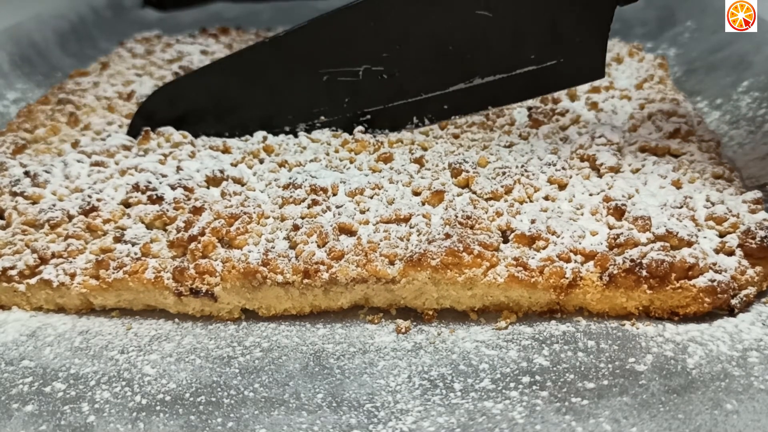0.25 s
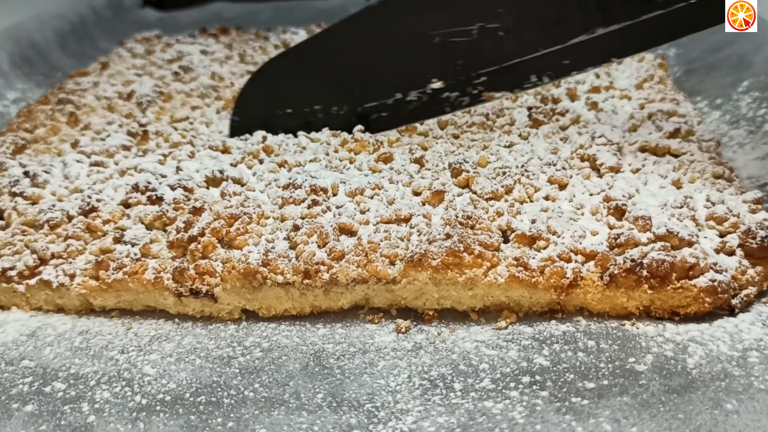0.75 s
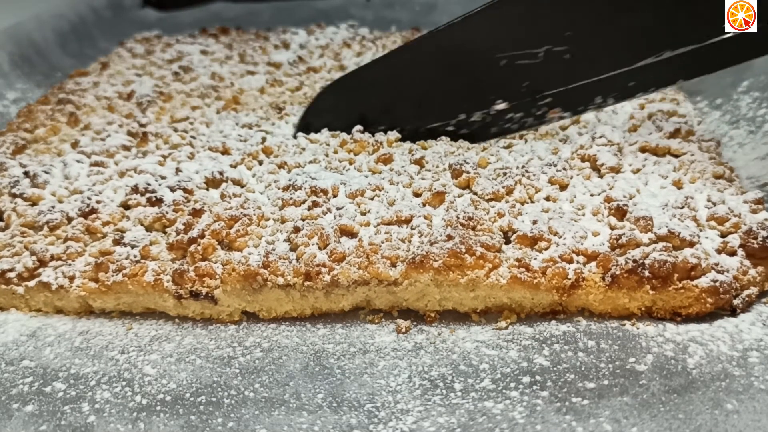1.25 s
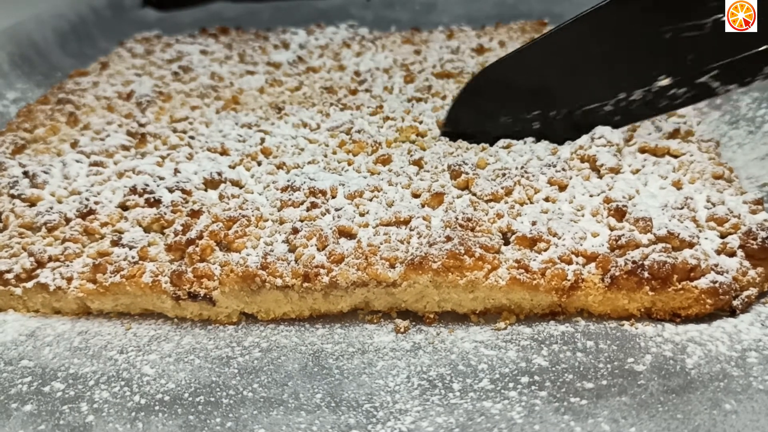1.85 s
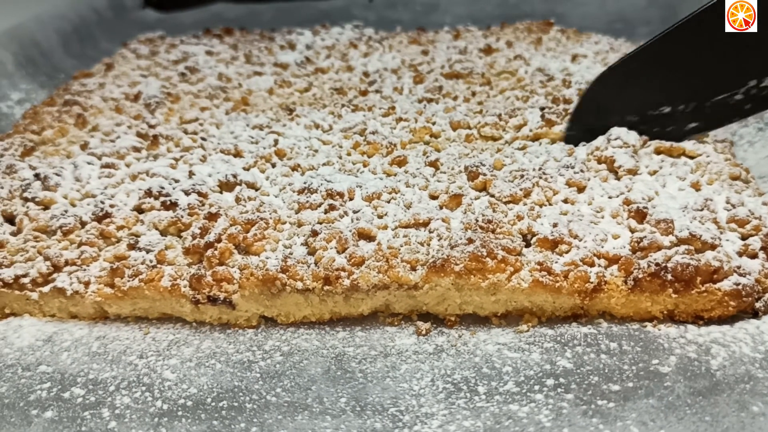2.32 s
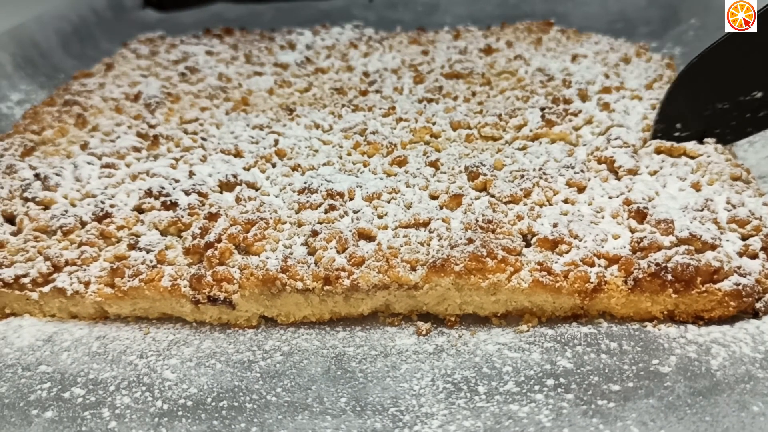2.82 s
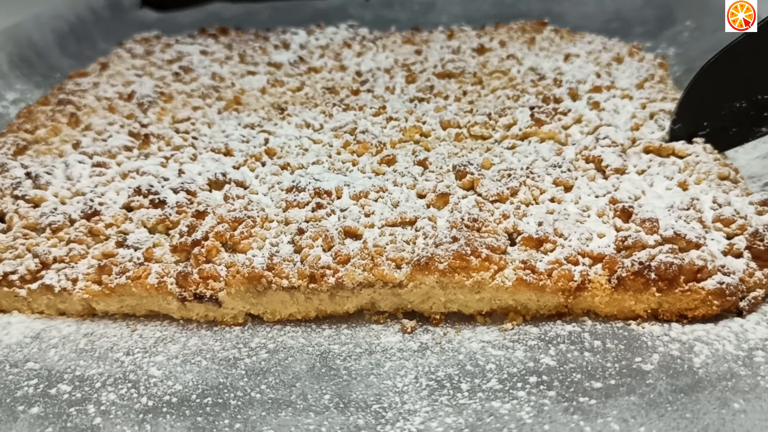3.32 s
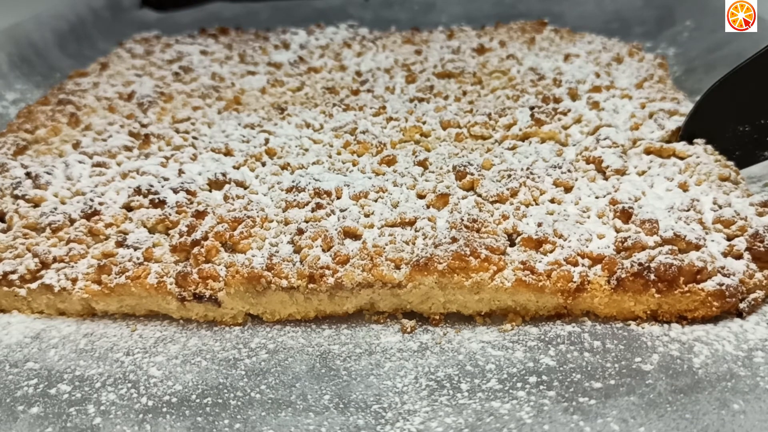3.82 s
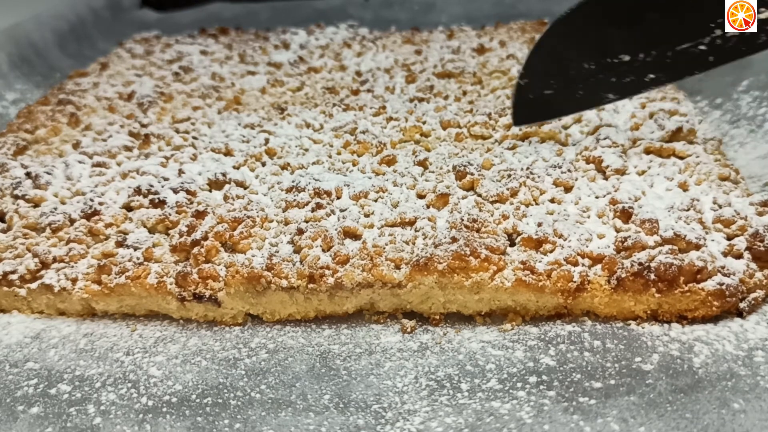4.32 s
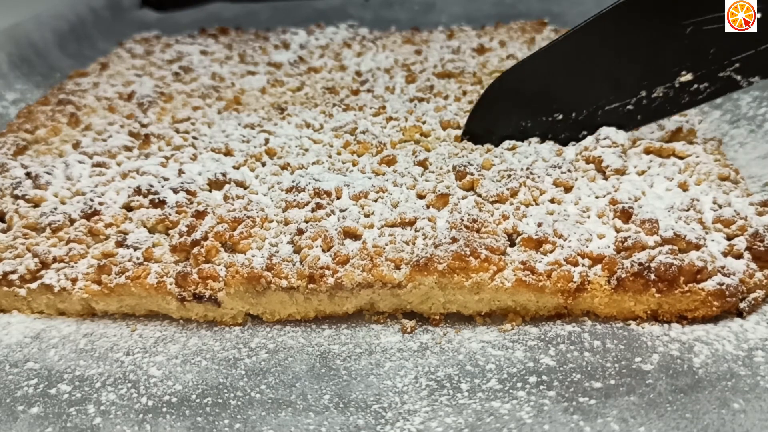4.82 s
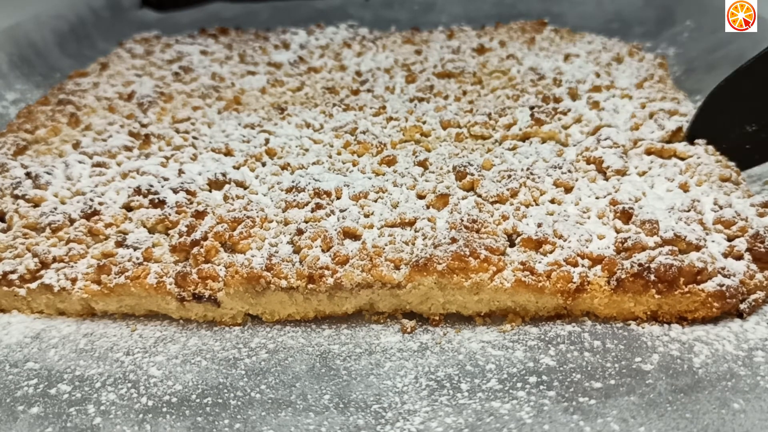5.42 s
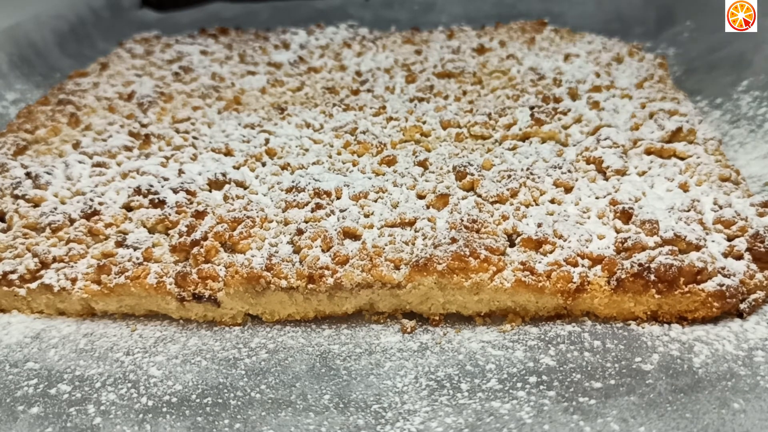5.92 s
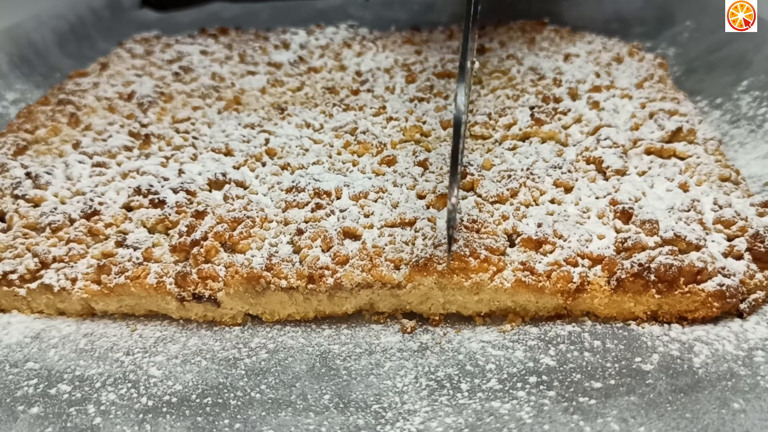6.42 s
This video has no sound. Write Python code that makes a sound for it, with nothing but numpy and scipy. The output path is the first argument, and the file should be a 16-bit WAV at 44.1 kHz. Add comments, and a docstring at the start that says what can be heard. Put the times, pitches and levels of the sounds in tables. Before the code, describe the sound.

A knife saws through the sugared crumb crust of a tart on a tray, close by in a small kitchen. From the start, short strokes hiss and grind softly, with little ticks and snaps of breaking crumbs. Lumps catch the blade and make the tray thud, lightly around 1 and 1.6 seconds, then harder at 2.1 and 3.1 seconds. The loudest crack and knock comes at 3.5 seconds, followed by another at 3.8 and a sharp click near 4.1. The steel rings faintly with the shocks. After a brief lull, cutting resumes at 4.8 seconds with a cluster of thuds and crunches, strongest at 4.9 and 5.2, and a crisp click at 5.6. Soft scraping continues until about 6.4 seconds. A low appliance hum and quiet room noise run throughout, and a very faint, distant tone sounds at 5.8 and 6.5 seconds.

```python
"""A small kitchen: a knife saws in short strokes over the sugared crumb crust of a tart on a tray.
The edge hisses on sugar, crumbs grind and snap, and lumps jolt the blade so that tart and tray thud.
The steel rings faintly with the shocks and sings for a moment here and there as it drags.
Underneath lie a low appliance hum and room noise; near the end a faint, far tone sounds twice."""
import sys
import numpy as np
from scipy import signal
from scipy.io import wavfile

SR = 44100
rng = np.random.default_rng(int(sys.argv[2]) if len(sys.argv) > 2 else 0)


def bounce(signal):
    """Save signal as a 16-bit WAV file at the path given by the first command-line argument."""
    frames = np.transpose(np.atleast_2d(signal))
    limited = np.clip(frames, -1, 1)
    pcm = np.round(limited * 32767).astype(np.int16)
    wavfile.write(sys.argv[1], SR, pcm)


N = 293706

# The blade saws to and fro. Each row: start in seconds, length in seconds, opening hiss in dB,
# closing hiss in dB, grinding in dB.
STROKES = [(-0.03, 0.21, -42, -45, -55.5), (0.214, 0.31, -59, -51.5, -60),
           (0.568, 0.34, -44.5, -53.5, -57.5), (0.856, 0.19, -57, -47.5, -53),
           (1.03, 0.12, -37, -50, -50.5), (1.187, .26, -39.5, -49.5, -53.5),
           (1.456, 0.22, -54.5, -42.5, -50), (1.724, 0.3, -44.5, -39, -55.5), (2.023, 0.13, -53, -39, -51),
           (2.152, 0.089, -51, -56, -64), (2.252, 0.25, -38, -51, -54), (2.516, 0.19, -51.5, -55, -60.5),
           (2.733, 0.22, -45, -51.5, -61.5), (2.951, 0.21, -50, -37.5, -48), (3.171, 0.2, -50, -44.5, -63),
           (3.457, 0.2, -49, -51, -47), (3.633, 0.19, -44.5, -44.5, -53), (3.808, 0.19, -26, -70, -51),
           (4.015, 0.15, -49, -51.5, -57), (4.812, 0.12, -70, -42, -57.5), (5.005, 0.2, -51.5, -52, -59.5),
           (5.305, 0.19, -45, -35, -50.5), (5.491, 0.21, -36.5, -63, -61), (5.64, 0.17, -74, -75, -61.5),
           (5.856, 0.3, -49.5, -67.5, -65), (6.11, 0.1, -52, -62, -69), (6.196, 0.18, -59, -52, -64)]
# The blade ploughs through a heap of crumbs. Each row: peak time in seconds, length in seconds,
# then hiss, crushing and rumble in dB.
CRUNCHES = [(0.349, 0.038, -47, -52, -47), (0.625, 0.023, -44, -46, -49), (1.08, 0.073, -50, -62, -47.5),
            (1.257, 0.026, -59, -42.5, -70), (1.587, 0.028, -34, -45, -32.5), (1.791, 0.051, -66, -44, -63),
            (2.126, 0.042, -44, -46, -42.5), (2.336, 0.048, -36, -55, -59),
            (2.588, 0.06, -45.5, -54.5, -48.5), (2.691, 0.016, -37, -48, -46.5),
            (3.032, 0.022, -29.5, -38.5, -41.5), (3.061, 0.046, -32.5, -39, -38),
            (3.518, 0.025, -36, -41, -45), (3.543, 0.01, -19.5, -20.5, -24), (3.695, 0.054, -53, -56, -52),
            (3.817, 0.023, -35, -35.5, -42), (4.952, 0.033, -54, -57, -38), (5.051, 0.043, -58, -47, -30),
            (5.109, 0.037, -48, -47.5, -37), (5.204, 0.038, -45, -45, -45.5), (5.323, 0.045, -56, -49, -38),
            (5.452, 0.073, -39.5, -39, -33.5), (5.57, 0.045, -30.5, -46, -72)]
# The blade catches a lump. Each row: time in seconds, thud drive in dB, rebound in dB against the thud,
# then crack, snap and tick in dB.
CATCHES = [(.159, -50, -12, -51, -57, -40), (0.249, -57, -14, -60, -64, -46),
           (0.274, -43, -12, -55, -66, -36), (0.478, -35, -12, -47.5, -63, -34),
           (0.6649, -45, -10, -61, -65, -43), (0.709, -48, -10, -66, -56, -32),
           (0.936, -33.5, -6, -39.5, -60, -32), (1.0447, -27.5, -12, -30.5, -35, -26),
           (1.0733, -26.5, -9.5, -35.5, -37, -32), (1.5727, -23, -26, -33.5, -52, -29),
           (1.585, -15, -16, -29.5, -46, -40), (1.606, -32, -14, -53, -46, -45),
           (1.684, -56, -10, -62, -61, -39), (1.721, -45, -14, -57, -48, -46),
           (1.725, -60, -12, -64, -60, -32), (2.046, -43, -12, -55, -48, -46),
           (2.1344, -7.5, -18.5, -32.5, -37, -49), (2.203, -42, -12, -60, -49, -48),
           (2.6836, -38, -6, -38, -36, -25), (2.7683, -53, -12, -45.5, -57, -21),
           (3.007, -31.5, -10, -39, -39, -27), (3.0709, -7.5, -16, -23.5, -27, -28),
           (3.0967, -21.5, -10, -55, -36, -23.5), (3.4457, -44, -16, -46, -41, -34.5),
           (3.502, -29, -15, -38, -38, -40), (3.5202, -22.5, -5, -25, -23, -26),
           (3.5416, 2, -13.5, -18, -8, -16), (3.578, -22.5, -9, -38, -50, -50),
           (3.619, -21, -9.5, -59, -55, -55), (3.821, -4.5, -12.5, -21.5, -26, -27),
           (3.867, -31, -16, -50, -50, -50), (3.879, -50, -12, -55, -42, -42),
           (3.905, -36, -12, -34.5, -28.5, -30), (3.9993, -36, -12, -42, -32, -27.5),
           (4.053, -45, -12, -55, -55, -46), (4.076, -37, -9, -37, -17, -10),
           (4.13, -32, -14, -45, -41, -27), (4.685, -58, -12, -68, -63, -37),
           (4.8564, -59, -12, -47, -51, -57), (4.8974, -0.5, -20, -22, -62, -32),
           (4.923, -20, -13, -53, -60, -62), (4.952, -45, -12, -37.5, -34.5, -42),
           (5.0409, -14.5, -17, -40, -63, -54), (5.053, -18.5, -12, -36, -47, -55),
           (5.069, -30, -20, -47, -55, -55), (5.1086, -36, -12, -34, -55, -45),
           (5.208, -3, -16, -18.5, -55, -53), (5.235, -19, -9, -42, -60, -60),
           (5.326, -18, -21, -37.5, -55, -53.5), (5.41, -14, -19, -25.5, -28, -30),
           (5.431, -23.5, -7, -24, -36, -35), (5.436, -28, -10, -26, -22.5, -44),
           (5.46, -19, -10, -29, -31, -45), (5.516, -38, -10, -57, -45, -40),
           (5.5295, -28, -19, -35, -28.5, -22), (5.565, -54, -12, -64, -35, -30),
           (5.604, -57, 0, -35, -20.5, -10), (5.746, -48, -23, -53, -43.5, -57),
           (5.892, -87, -12, -62, -47, -43)]
# Crack, snap and tick of a crumb. Each row: low and high edge in Hz, delay and t60 in seconds.
BREAK_BANDS = [(1050, 3600, .0005, .022), (5000, 7000, .002, .012), (7600, 13500, .002, .009)]
# The colour of the edge on sugar. Each row: frequency in Hz, relative spectral level in dB.
HISS_COLOUR = [(3530, -5.5), (5900, 3), (6400, 3), (7200, 4), (7900, 3.5), (8600, 9), (9800, 7),
               (10300, 10.5), (10800, 9), (11300, 2), (14700, -35), (22000, -120)]
# The colour of grinding crumbs. Each row: frequency in Hz, relative spectral level in dB.
GRIND_COLOUR = [(530, -28), (900, 4), (1630, 0.5), (1740, 6.5), (2290, 2.5), (2990, 1), (5550, 8),
                (7000, -83), (9100, -59), (15400, -120)]
# The resonances of tart and tray. Each row: pitch in Hz, relative level in dB, t60 in seconds.
TRAY_MODES = [(130.4, -6, 0.35), (345, -14, 0.22), (362, -16, 0.2), (422, -14, 0.25), (448.5, -19, 0.2),
              (500.5, -18.5, 0.23), (553, -33, 0.15), (600, -12, 0.2), (712, -19, 0.15), (872, -14, 0.11),
              (1005, -13, 0.09), (1200, -18, .08), (1390, -15.5, 0.054)]
# The resonances of the steel. Each row: pitch in Hz, relative level in dB, t60 in seconds.
BLADE_MODES = [(1000, -8, 0.02), (1400, -10, 0.015), (1680, -7, 0.018), (2224, -4, .022), (2455, -2, 0.017),
               (2790, -3, 0.022), (3222, -5, 0.016), (3810, -5, 0.013), (4285, -7, 0.015),
               (5280, -12, 0.012)]
# The dragged blade sings. Each row: peak time in seconds, length in seconds, pitch in Hz, level in dB.
BLADE_NOTES = [(.75, .2, 10800, -55), (1.33, .2, 10600, -52), (1.26, .035, 1000, -46),
               (1.26, .035, 1680, -45), (1.26, .05, 2450, -43), (1.254, .025, 4100, -46),
               (1.59, .027, 1300, -41), (1.798, .04, 2200, -44), (1.79, .03, 2650, -47),
               (5.055, .04, 1050, -42), (5.055, .036, 2760, -46), (5.055, .04, 3870, -47),
               (5.33, .03, 1000, -44), (5.45, .05, 1840, -41), (5.585, .022, 8300, -39)]
# The appliance's wavering hum. Each row: pitch in Hz, bandwidth in Hz, level in dB.
HUM_BANDS = [(130.4, 2, -61), (208.3, 15, -59), (263.5, 4.2, -57.5), (420.8, 15, -62)]
# A distant tone. Each row: start in seconds, length in seconds, pitch in Hz, level in dB.
FAR_TONES = [(5.81, 0.18, 868, -58), (6.51, 0.12, 832, -52.5)]
# The colour of the room noise. Each row: frequency in Hz, relative spectral level in dB.
ROOM_COLOUR = [(15, -74), (25, -86), (81, -9.5), (136, 7), (180, -1.5), (215, 12.5), (232, -23),
               (264, -1.5), (452, -4), (836, -8), (1510, -14.5), (7380, -26), (9780, -22.5), (11400, -30.5),
               (14800, -78), (22000, -120)]
# Stereo width of the noise beds. Each row: frequency in Hz, left-right likeness (1 is mono).
STEREO_LIKENESS = [(60, 0.26), (180, 0.53), (550, 0.077), (1650, -0.0), (4970, 0), (15000, 0)]
# Stereo balance of the noise beds. Each row: frequency in Hz, left over right in dB.
STEREO_LEAN = [(60, 8.5), (240, 4.5), (950, 3.5), (3770, 1), (15000, 2.5)]

THUD_HZ, THUD_T60_S = 533, 0.0083
REBOUND_HZ, REBOUND_T60_S = 378, 0.053   # the whole tray bounces, deeper than the first thud
TRAY_CUT_HZ = 310   # too small a body to send out deep bass
RIGHT_LAG = 11   # samples: the knife is nearer the left
SIDE = np.array([[1], [-1]])   # adds on the left, subtracts on the right


def knife_strokes():
    """Sugar hisses and crumbs grind straight into the air; the dragging force shakes the tray."""
    hiss_level, grind_level, rumble_level, crush_level = stroke_envelopes()
    sugar = coloured(grains(5000, spread_db=2, clump_db=1.5), HISS_COLOUR, flicker_db=1.8, per_octave=8)
    crumbs = coloured(grains(4000, spread_db=1.6, clump_db=1.5), GRIND_COLOUR, flicker_db=1.5)
    mid, side = grains(2000, spread_db=2, clump_db=2)[0]
    drag = band(mid + 0.43 * side * SIDE, TRAY_CUT_HZ, 2000)
    force = rumble_level * drag
    rumble = ring(force, THUD_HZ, THUD_T60_S) + 0.25 * tray_ring(force)
    rumble /= np.std(ring(drag, THUD_HZ, THUD_T60_S))
    heap = rms_one(band(crumbs, 1210, 4300) + crumbs)   # a heap crushes duller than the crust grinds
    return hiss_level * sugar + grind_level * crumbs + crush_level * heap + rumble


def stroke_envelopes(attack_s=0.044, release_s=0.046, settle_s=0.1, rise_share=0.46):
    """Hiss, grind, rumble and crush levels: strokes swell, slide and let go; crunches ride on top."""
    hiss, grind, rumble, crush = range(4)
    t, power = np.arange(N) / SR, np.zeros((4, N))
    for start, length, first_db, last_db, grind_db in STROKES:
        span = slice(max(round(start * SR), 0), round((start + length) * SR))
        age = t[span] - start
        hiss_db = first_db + (last_db - first_db) * age / length
        crumb_db = grind_db + 0.8 * (hiss_db - (first_db + last_db) / 2)   # follows the hiss's slope
        ramp = np.clip(np.minimum(age / attack_s, (length - age) / release_s), 0, 1)
        contact = np.sin(np.pi / 2 * ramp) ** 2
        power[[hiss, grind, rumble], span] += (contact * from_db([hiss_db, crumb_db, crumb_db - 6])) ** 2
    power[hiss] *= from_db(-3 * drift(5.6)) ** 2   # uneven contact
    power[rumble] *= from_db(-3.5 * drift(6.4)) ** 2
    fade = np.exp(-1 / (settle_s * SR))
    trickle = signal.lfilter([1 - fade], [1, -fade], power[[hiss, grind]])   # loosened sugar runs on
    power[[hiss, grind]] += from_db(-13.5) ** 2 * trickle
    for peak, length, *levels_db in CRUNCHES:
        span = slice(round((peak - .12) * SR), round((peak + .18) * SR))
        slope_s = length * np.where(t[span] < peak, rise_share, 1 - rise_share)
        swell = np.exp(-((t[span] - peak) / slope_s) ** 2)
        power[[hiss, crush, rumble], span] += np.outer(from_db(levels_db), swell) ** 2
    return np.sqrt(power)


def grains(per_s, spread_db, clump_db):
    """Tiny fractures in random clumps, each a short noise burst; gives two mid-side pairs."""
    fractures = rng.random(N) < per_s / SR
    size_db = spread_db * np.minimum(rng.exponential(1, N), 4) + clump_db * drift(25)
    bursts = signal.lfilter([1], [1, -.93], fractures * from_db(size_db))
    return bursts * rng.standard_normal((2, 2, N))


def lump_thuds(lead_s=0.0006, rebound_s=0.0122):
    """Just before a lump breaks, tart and tray thud; they rebound once and the worktop jolts deeply."""
    times, thud_db, rebound_db = np.transpose(CATCHES)[:3]
    at = (times * SR).astype(int)
    force = from_db(thud_db) * pan(left_db=1.7)
    push, rebound = np.zeros((2, 2, N))
    push[:, at - round(lead_s * SR)] = -force
    rebound[:, at + round((rebound_s - lead_s) * SR)] = from_db(rebound_db) * force
    worktop = from_db(7.5) * band(push + 1e-18, 25, 87.5)
    cushion = 0.66 / 16 * rms_one(np.hanning(36))   # the crust gives for about a millisecond
    softened = signal.lfilter(cushion, [1], np.array([push, rebound]) + 1e-18)
    push, rebound = band(softened, TRAY_CUT_HZ, 4600)
    thuds = ring(push, THUD_HZ, THUD_T60_S) + ring(rebound, REBOUND_HZ, REBOUND_T60_S)
    tail = tray_ring(0.28 * push + 2 * rebound)   # the tray rings little until it rebounds
    return worktop + band(thuds, 214, 4000) + from_db(-10.5) * tail


def crumb_breaks():
    """Each lump breaks in three quick bursts of noise: a crack, a brighter snap and a tick on top."""
    times, _, _, *bursts_db = np.transpose(CATCHES)
    at, out = (times * SR).astype(int), 0
    for (low, high, delay, t60), level_db in zip(BREAK_BANDS, bursts_db):
        onsets = np.zeros((2, N))
        onsets[:, at + round(delay * SR)] = from_db(level_db) * pan(left_db=0.5)
        decay = signal.lfilter([1], [1, -from_db(-60 / (t60 * SR))], onsets + 1e-18)
        envelope = signal.lfilter([.1], [1, -.9], decay)   # rounds the attack, well under a millisecond
        shared, *each_side = rng.standard_normal((3, N))
        noise = from_left(shared, RIGHT_LAG) + 1.86 * np.array(each_side)
        out += envelope * rms_one(band(band(noise, low, high), low / 1.2, high * 1.05))
    return out


def tray_ring(force):
    """Every mode of tart and tray answers each push with a strength of its own."""
    return sum(from_db(db) * ring(force * from_db(1.8 * drift(20)), hz, t60)
               for hz, db, t60 in TRAY_MODES)


def blade_ring(knife):
    """Shocks set the steel ringing briefly; which modes speak changes with grip and angle."""
    shocks = band(knife[0], 1360, 9100)
    steel = sum(from_db(db) * ring(shocks * from_db(3.5 * drift(6)), hz, t60)
                for hz, db, t60 in BLADE_MODES)
    return from_db(-35) * from_left(steel, RIGHT_LAG)


def blade_song():
    """Friction noise through one narrow steel resonance per note, swelling and fading."""
    notes = np.zeros(N)
    for peak, length, hz, db in BLADE_NOTES:
        first, last = max(round((peak - length) * SR), 0), round((peak + length) * SR)
        friction = rng.standard_normal(SR)[:last - first]
        from_peak_s = np.arange(first, last) / SR - peak
        swell = np.exp(-(1.08 * from_peak_s / (length / 2)) ** 2)
        notes[first:last] += from_db(db) * swell * rms_one(ring(friction, hz, t60=.012))
    return from_left(notes, lag_samples=4)


def kitchen_echoes(sound, t60=0.13, wall_cut_hz=5400):
    """Dense, short echoes dulled by the walls; alike on both sides in the bass only."""
    t = np.arange(SR // 3) / SR
    mid, side = rng.standard_normal((2, len(t))) * from_db(-60 * t / t60) * (t > .003)
    echoes = mid + signal.lfilter(*signal.butter(1, 500, "high", fs=SR), side) * SIDE
    echoes = signal.lfilter(*signal.butter(1, wall_cut_hz, fs=SR), echoes)
    return signal.fftconvolve(sound, rms_one(echoes) / np.sqrt(len(t)), axes=1)[:, :N]


def appliance_hum():
    """An appliance drones to the left: narrow bands of noise that waver like unsteady tones."""
    out = 0
    for hz, width, db in HUM_BANDS:
        mid, side = ring(rng.standard_normal((2, N)), hz, t60=3.9 / width)
        out += from_db(db) * rms_one(mid + 0.58 * side * SIDE) * pan(left_db=4)
    return out


def far_tones():
    """A faint, pure tone swells and fades far off."""
    t, out = np.arange(N) / SR, 0
    for start, length, hz, db in FAR_TONES:
        swell = np.sin(np.pi * np.clip((t - start) / length, 0, 1)) ** .5
        out += from_db(db) * swell * np.sin(2 * np.pi * hz * t)
    return out


def room_noise():
    """A steady, dark bed of noise under everything."""
    return from_db(-48) * coloured(rng.standard_normal((2, 2, N)), ROOM_COLOUR, flicker_db=-0.08)


def coloured(pairs, colour, flicker_db, per_octave=3):
    """Two mid-side pairs shaped band by band in level, flicker, width and balance; rms 1."""
    low_hz, high_hz = max(colour[0][0], 25), min(colour[-1][0], 12500)
    edges = np.geomspace(low_hz, high_hz, 1 + round(per_octave * np.log2(high_hz / low_hz)))
    out = 0
    for k, (low, high) in enumerate(zip(edges, edges[1:])):
        mid, side = band(pairs[k % 2], low, high)
        hz = np.sqrt(low * high)
        alike = at_hz(STEREO_LIKENESS, hz)
        stereo = np.sqrt(1 + alike) * mid + np.sqrt(1 - alike) * side * SIDE
        gain = from_db(at_hz(colour, hz) + flicker_db * drift(7))
        out += gain * pan(at_hz(STEREO_LEAN, hz)) * stereo
    return rms_one(out)


def drift(rate_hz):
    """A slow random wander: noise twice through a one-pole low-pass; rms 1."""
    pole = np.exp(-80 * np.pi * rate_hz / SR)
    slow = signal.lfilter([1], [1, -2 * pole, pole * pole], rng.standard_normal(N // 40 + 2002))[2000:]
    return np.interp(np.arange(N) / 40, np.arange(len(slow)), rms_one(slow))


def ring(x, hz, t60):
    """One resonance: a unit click sets a sine of height 1 ringing down."""
    pole, angle = from_db(-60 / (t60 * SR)), 2 * np.pi * hz / SR
    return signal.lfilter([0, np.sin(angle)], [1, -2 * pole * np.cos(angle), pole * pole], x + 1e-18)


def band(x, low_hz, high_hz):
    return signal.sosfilt(signal.butter(2, [low_hz, high_hz], "band", fs=SR, output="sos"), x)


def from_left(x, lag_samples):
    return np.array([x, np.roll(x, lag_samples)])


def pan(left_db):
    return from_db(left_db / 2 * SIDE)


def at_hz(curve, hz):
    frequencies, values = np.transpose(curve)
    return np.interp(np.log(hz), np.log(frequencies), values)


def from_db(db):
    return 10 ** (np.asarray(db) / 20)


def rms_one(x):
    return x / np.sqrt(np.mean(x ** 2) + 1e-20)


def scene():
    """The knife up front, a touch of kitchen around it, the quiet background below."""
    knife = knife_strokes() + lump_thuds() + crumb_breaks()
    knife = knife + blade_ring(knife) + blade_song()
    return knife + from_db(-11.5) * kitchen_echoes(knife) + room_noise() + appliance_hum() + far_tones()


def record(dry, dip_hz=7170, dip_width_hz=2600, edge_hz=11305, whistle_hz=15570, cutoff_hz=16400):
    """The sound dips near 7 kHz and drops past a treble edge, save one narrow band and a faint hiss;
    peaks clip."""
    dipped = dry - 0.44 * band(dry, dip_hz - dip_width_hz / 2, dip_hz + dip_width_hz / 2)
    body = signal.sosfilt(signal.ellip(6, .5, 30, edge_hz, fs=SR, output="sos"), dipped)
    spill = np.abs(band(dipped, 7000, 11300)) * rng.standard_normal(dry.shape)   # follows the treble
    narrow_hz = whistle_hz - 220, whistle_hz + 220
    whistle = from_db(11) * band(band(spill, *narrow_hz), *narrow_hz)
    faint_top_hiss = from_db(-73) * band(rng.standard_normal(dry.shape), edge_hz, 15000)
    clipped = np.clip(body + whistle + faint_top_hiss, -.97, .97)
    return signal.sosfilt(signal.cheby2(12, 70, cutoff_hz, fs=SR, output="sos"), clipped)


dry = scene()
out = record(dry)
bounce(out)
```